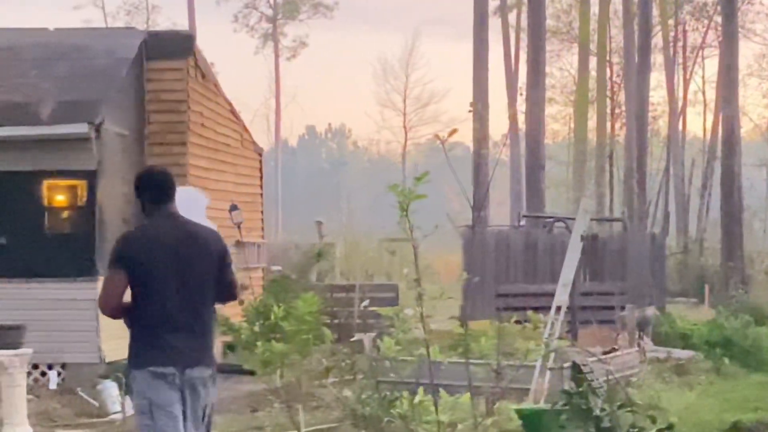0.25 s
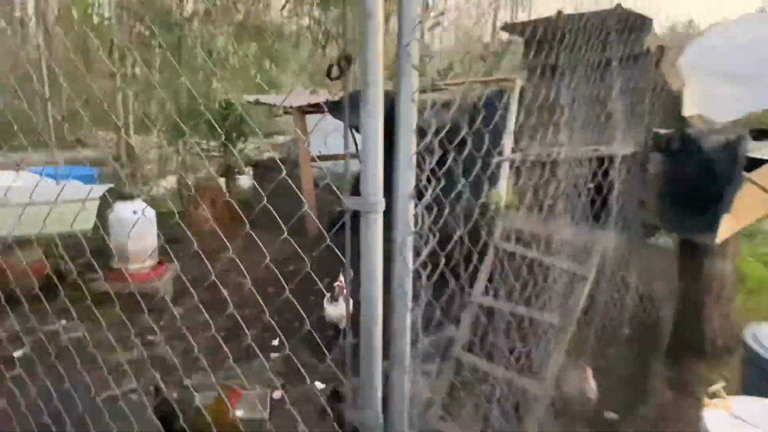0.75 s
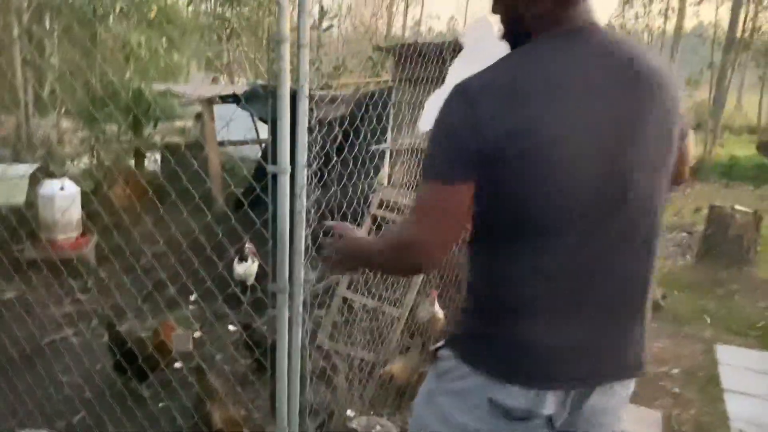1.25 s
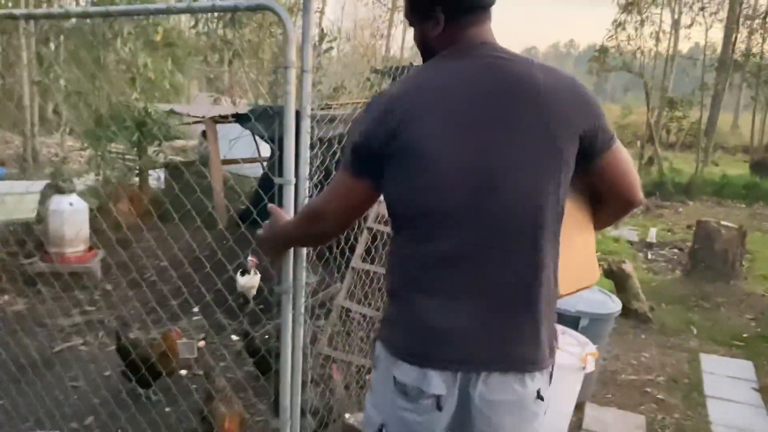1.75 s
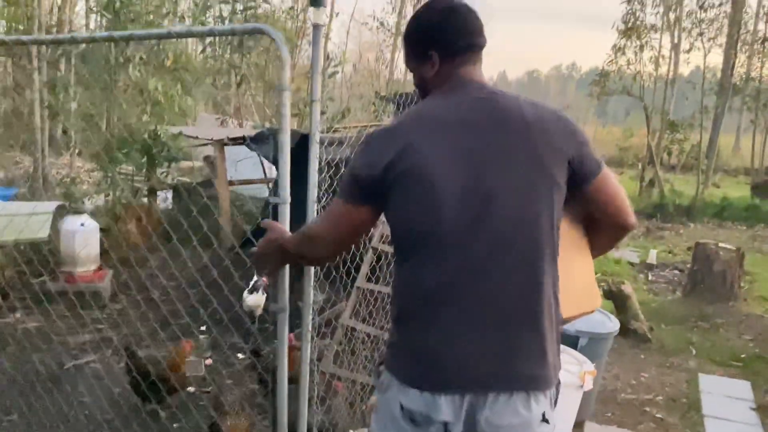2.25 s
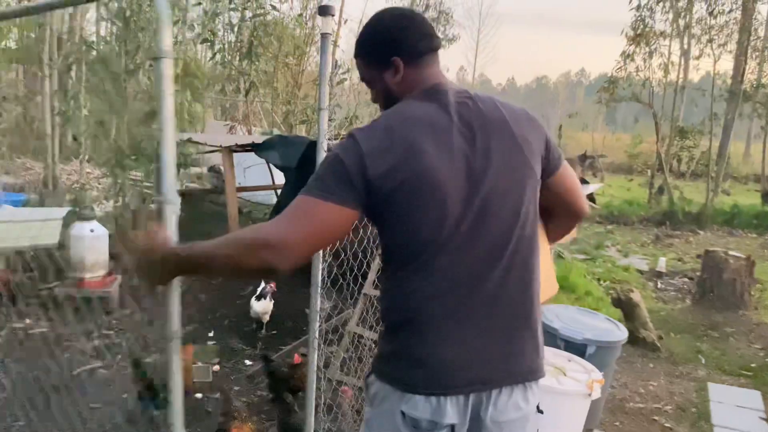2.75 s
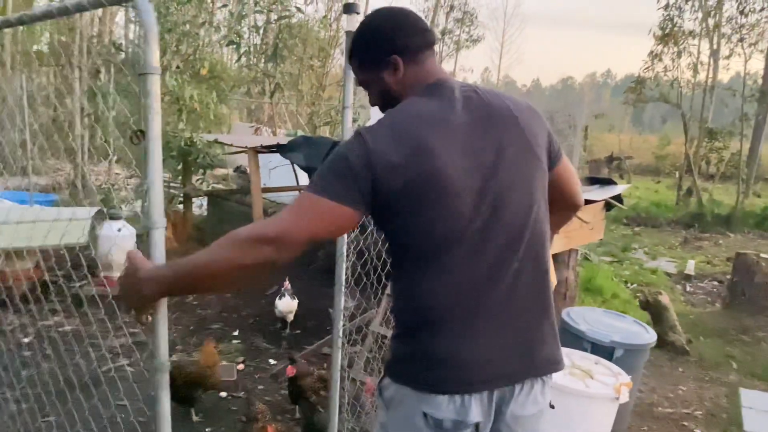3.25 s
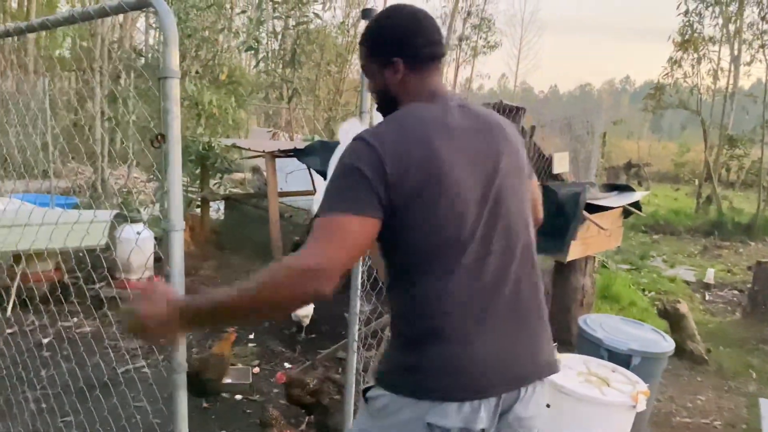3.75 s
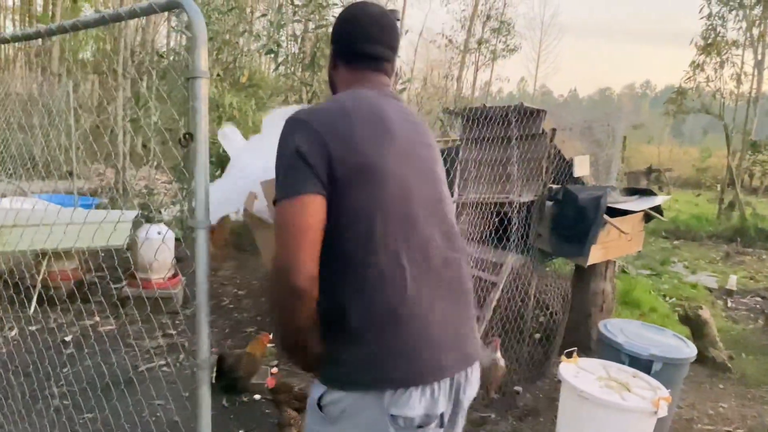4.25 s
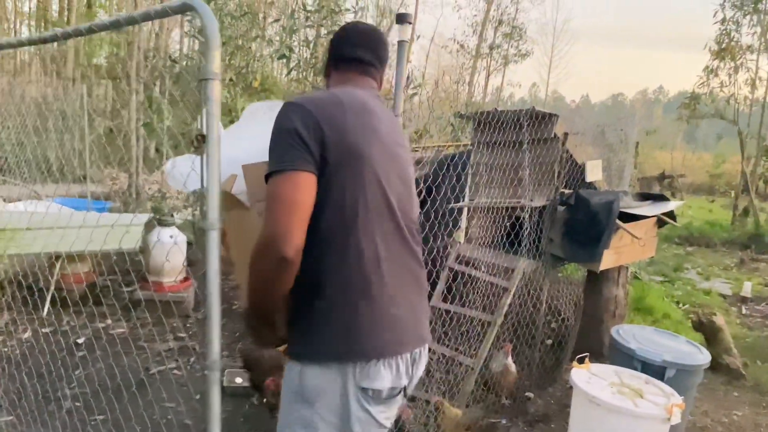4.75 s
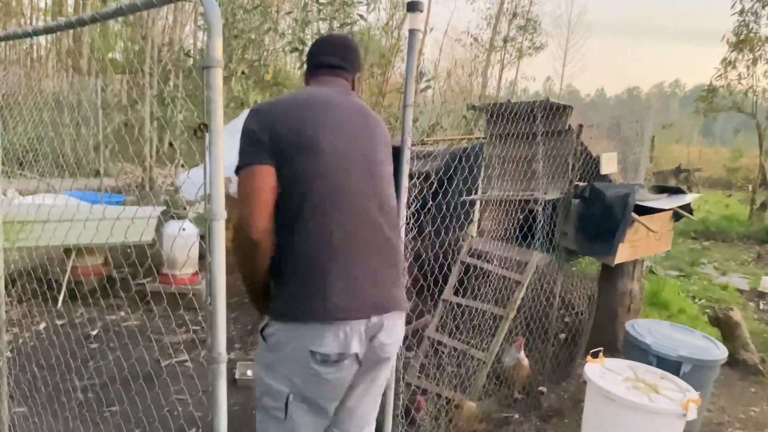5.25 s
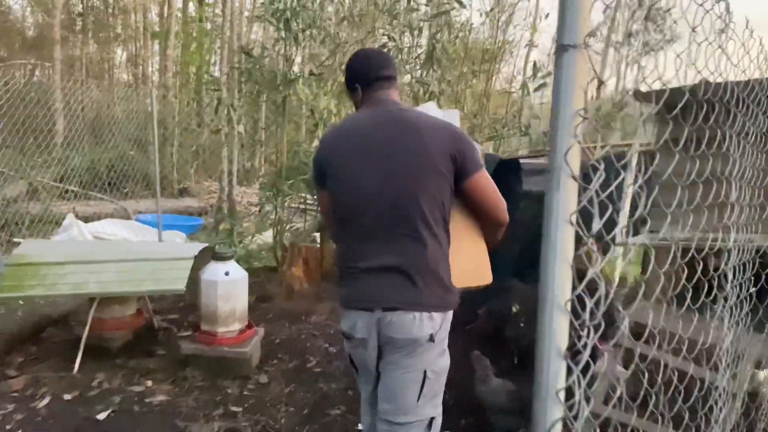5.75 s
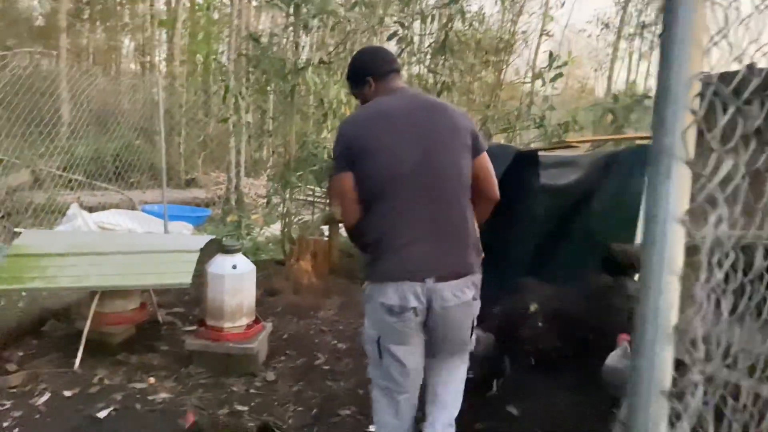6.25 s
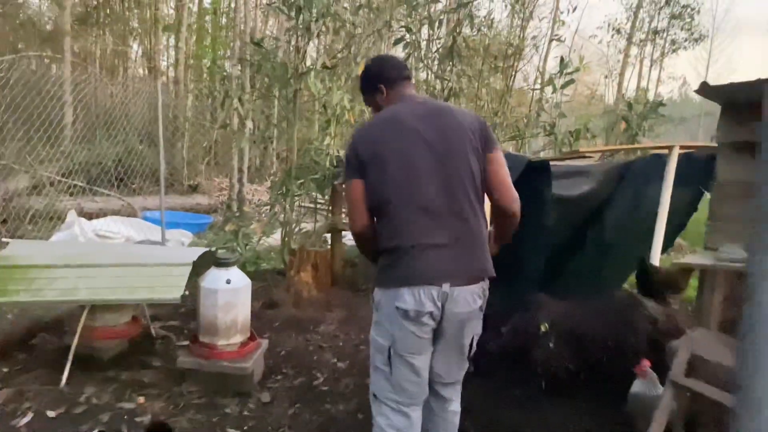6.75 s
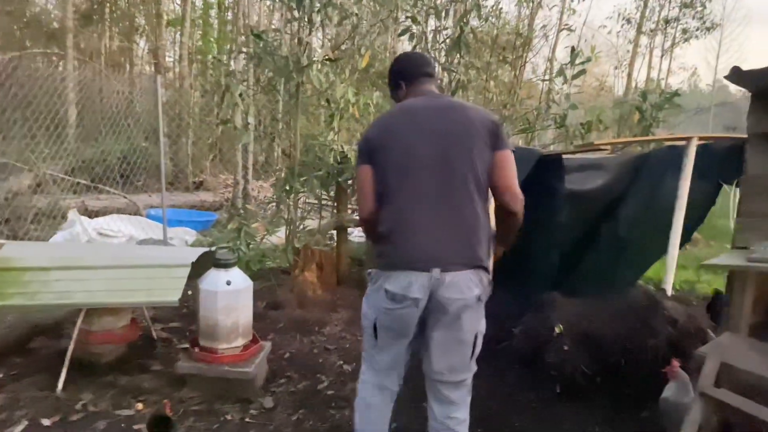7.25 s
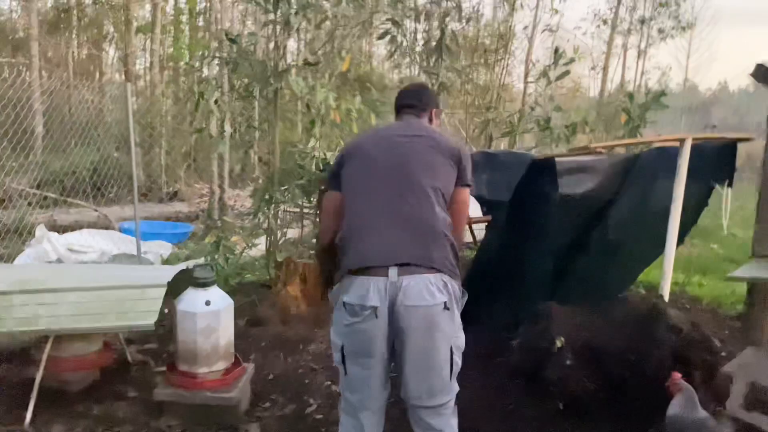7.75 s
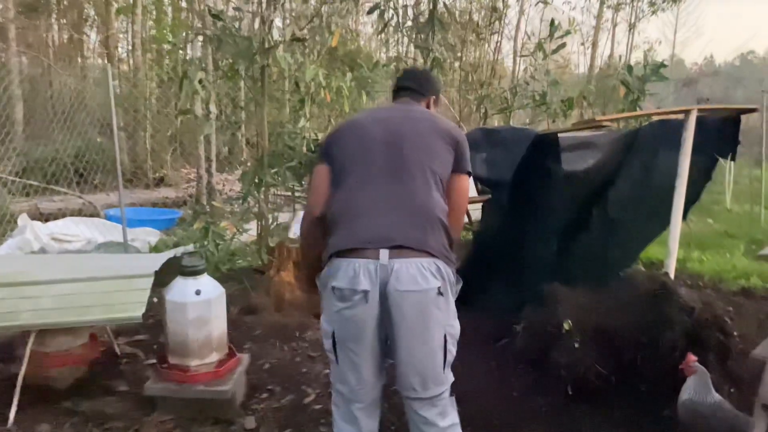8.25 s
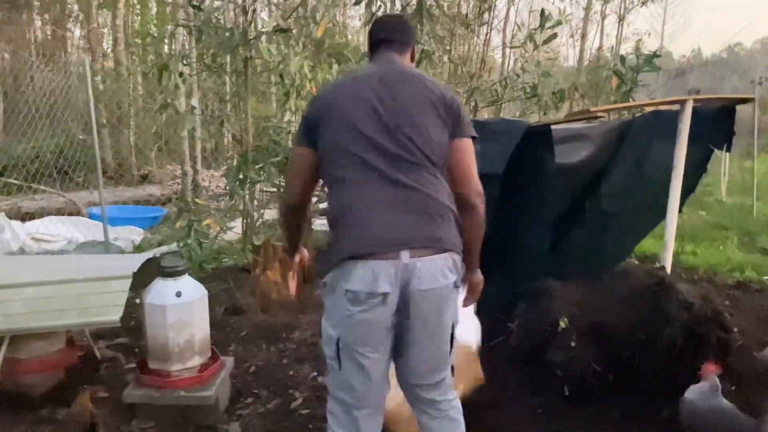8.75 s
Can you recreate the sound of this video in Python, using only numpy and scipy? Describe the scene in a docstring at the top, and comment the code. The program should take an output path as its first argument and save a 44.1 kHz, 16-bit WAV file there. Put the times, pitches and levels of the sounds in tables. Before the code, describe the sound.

Close in a quiet outdoor chicken run, hens give short low clucks, a long rising whine, then a wavering drawn-out moan. Feet and a bag rustle, wire ticks, and a small songbird whistles rising phrases. A far engine hums low in the second half. A sharp dry knock comes late, more hoarse hen calls follow, and a cardboard box lands with a hollow crunchy thump at the end.

```python
"""Hens call with drawn-out clucks and whines in a backyard run while a keeper walks in and drops a box.
A songbird repeats a rising phrase, insects sing, a wire gate ticks, feet and a bag rustle, a far engine hums.
Hens are sums of partials on drawn pitch curves with throat noise; bird notes are gliding sines with echoes.
The box, ticks and thuds are struck resonances; rustles are grainy noise; the engine is one swelling sine.
Insects, traffic rumble and the murmur of the yard are noise shaped to a band or spectrum."""
import sys
import numpy as np
from scipy import signal
from scipy.fft import rfft, irfft, next_fast_len
from scipy.io import wavfile
from scipy.ndimage import uniform_filter1d

SR = 44100
rng = np.random.default_rng(int(sys.argv[2]) if len(sys.argv) > 2 else 0)


def store_wav(level_fs):
    """Save 16-bit WAV to argv[1]."""
    pcm = np.round(np.clip(np.atleast_2d(level_fs), -1, 1) * 32767)
    wavfile.write(sys.argv[1], SR, pcm.T.astype(np.int16))


N = 396900
T = np.arange(N) / SR

# low moans and clucks, each a pair: (left minus right/dB, final hoarseness/0-1, fundamental change/dB),
# then rows of [t/s, pitch f/Hz, second partial level/dB, third partial level/dB]
MOANS = [ ((6, .25, 0), [(0.958, 337.4, -56, -75), (.972, 335, -48, -58), (.99, 335, -58, -51),
         (1.012, 325, -54, -60), (1.035, 316, -57, -48), (1.122, 310, -78, -58.5)]), ((0, .05, -12),
         [(1.268, 350, -62, -72), (1.36, 376, -63, -68)]), ((2, .3, 0), [(3.465, 315, -58, -48),
         (3.52, 346.3, -60, -62), (3.58, 362.7, -63, -72), (3.67, 409.6, -40, -62), (3.76, 398, -45.5, -82),
         (3.93, 362, -51.5, -48.5), (4.055, 405, -46, -52.5), (4.2, 384.8, -50.5, -47),
         (4.31, 413, -44, -49.5), (4.4, 396.5, -53, -48.5), (4.43, 424.6, -44, -48), (4.482, 420, -38, -54),
         (4.505, 410, -52, -65)]), ((-6, .2, -8), [(5.47, 335, -64, -46), (5.554, 348, -61, -43)]),
         ((3, .5, 3), [(7.103, 325, -56, -48), (7.132, 328, -56, -54)]), ((3, .12, 0),
         [(7.227, 314, -52, -57), (7.29, 377, -44.5, -58), (7.36, 381.6, -41, -62), (7.45, 370.2, -44, -58),
         (7.59, 391, -42, -62), (7.805, 405, -39, -69), (7.942, 402, -38.5, -71)]), ((4, .25, 0),
         [(8.085, 279.1, -65, -56.5), (8.17, 266.8, -72, -74)]), ((4, .6, 2), [(8.295, 280, -78, -66),
         (8.345, 299, -59, -60), (8.42, 325, -50, -52), (8.462, 346.3, -48, -54), (8.5, 315, -53, -57),
         (8.575, 372, -52, -46), (8.6, 412, -44, -49), (8.625, 350, -51, -47), (8.642, 315, -54, -50)]), ]
# high whines, each a pair: (left minus right/dB, final hoarseness/0-1),
# then rows of [t/s, pitch f/Hz, first partial level/dB, second partial level/dB]
WHINES = [ ((6, .3), [(0.758, 860, -50, -80), (.766, 890, -42, -80), (.776, 930, -57, -82),
          (0.797, 935, -47, -82), (.84, 940, -57, -86), (.857, 940, -49, -86), (0.872, 930, -56, -86)]),
          ((-4, .05), [(1.415, 696, -58.5, -75), (1.51, 719, -53.5, -59), (1.6, 720, -51.5, -52.5),
          (1.82, 746, -49, -49.5), (2.125, 765, -45.5, -44), (2.16, 680, -52, -46)]), ]
# spectrum of dry litter and bag: [f/Hz, relative level/dB]
LITTER = [(500, 1.5), (1200, 0), (2300, 2), (3500, 2.5), (5000, -1), (7000, 1), (8800, -12), (11000, -5),
          (15800, -9), (16100, -34)]


def amp(db):
    """dB to gain."""
    return 10 ** (np.asarray(db) / 20)


def unit(x):
    """Scale to rms 1."""
    return x / np.sqrt(np.mean(x ** 2) + 1e-20)


def in_time(rows):
    """Columns of a curve, interpolated at every sample."""
    s, *columns = np.transpose(rows)
    return [np.interp(T, s, c) for c in columns]


def at_hz(points, hz):
    """Read a spectrum on a log frequency axis."""
    corner_hz, values = np.transpose(points)
    return np.interp(np.log(hz), np.log(corner_hz), values)


def drift(rate_hz):
    """Random wander of rms 1: noise through a two-pole lowpass, made at a 20th of the sample rate."""
    r = np.exp(-40 * np.pi * rate_hz / SR)
    white = rng.standard_normal(N // 20 + 4002)
    slow = signal.lfilter([1], [1, -2 * r, r * r], white)[4000:]   # past the filter's start
    return np.interp(np.arange(N) / 20, np.arange(len(slow)), unit(slow))


def ring(clicks, hz, t60):
    """Two-pole resonance: a unit click sets off a decaying sine of height 1."""
    r, w = amp(-60 / (t60 * SR)), 2 * np.pi * hz / SR
    return signal.lfilter([0, np.sin(w)], [1, -2 * r * np.cos(w), r * r], clicks + 1e-18)


def bandpass(x, low_hz, high_hz):
    """Keep the band between two edges."""
    return signal.sosfilt(signal.butter(2, [low_hz, high_hz], "band", fs=SR, output="sos"), x)


def highpass(x, hz):
    """Remove what lies below a corner."""
    return signal.sosfilt(signal.butter(2, hz, "high", fs=SR, output="sos"), x)


def panned(x, db):
    """Place a sound between the channels by left minus right dB."""
    return np.array([x * amp(db / 2), x * amp(-db / 2)])


def coloured(spectrum, white):
    """Shape two unrelated noises, as mid and side, to a spectrum and a stereo likeness; rms 1."""
    # how alike the channels are: [f/Hz, likeness/0-1]
    likeness = [(100, 0.93), (300, 0.31), (1000, 0.63), (2500, 0.2), (6000, 0.058), (12000, 0.028)]
    size = next_fast_len(N)
    hz = np.maximum(np.arange(size // 2 + 1) * SR / size, 1)
    mid, side = rfft(white, size) * amp(at_hz(spectrum, hz))
    alike = np.clip(at_hz(likeness, hz), 0, 1)
    mid, side = np.sqrt(1 + alike) * mid, np.sqrt(1 - alike) * side
    return unit(irfft(np.array([mid + side, mid - side]), size)[:, :N])


def grove(x, t60):
    """Scattered echoes from trunks and sheds: a decaying noise tail, a different one in each channel."""
    t = np.arange(int(.4 * SR)) / SR
    tail = rng.standard_normal((2, len(t))) * amp(-60 * t / t60) * (t > .008)
    return signal.fftconvolve(x[None], tail / np.sqrt(np.sum(tail ** 2) / 2), axes=1)[:, :N]


def hens():
    """Voiced partials; hoarseness makes their strength uneven, smears noise between them and adds rasp."""
    echo_db = -22
    side_db, hoarse, chest_db = manner()
    moans = voice([call for _, call in MOANS], first=2, chest_db=chest_db)
    whines = voice([call for _, call in WHINES], first=1)
    unevenness = np.sqrt(1 - hoarse ** 2) + hoarse * drift(103)
    calls = (moans + whines) * unevenness + rasp(moans, hoarse)
    return panned(calls, side_db) + amp(echo_db) * grove(calls, t60=0.3)


def voice(calls, first, chest_db=0):
    """Harmonic partials on one jittered pitch; moans also get a fundamental and fourth and fifth partials."""
    # the strained voice flips into a higher register: [start t/s, end t/s]
    breaks = [(4.069, 4.111), (4.27, 4.288), (4.47, 4.52), (7.608, 7.64), (7.68, 7.709), (7.75, 7.804),
              (7.814, 7.843), (7.849, 7.873), (7.882, 7.895), (7.912, 7.923)]
    break_ratio, jitter, shimmer_db = 1.18, 0.01131, 1   # jitter: rms share of pitch
    first_db, first_follows = -57.5, 0.3   # the fundamental follows effort weakly, in dB per dB
    first_break_db, third_break_db = -13, -15   # outer partials fade in breaks
    fourth_db, fourth_fades_hz = -16, 1300   # against the third; fades above the throat
    fifth_db, fifth_from_hz = -20, 1950   # against the third; fades below this upper resonance
    slope_db_per_hz = .05
    pitch, low_db, high_db = in_time([row for call in calls for row in call])
    calling = sum((T >= call[0][0]) & (T < call[-1][0]) for call in calls) > 0
    flips = sum((break_ratio - 1) * ((T > a) & (T < b)) for a, b in breaks)
    lift = uniform_filter1d(flips, size=260)
    phase = 2 * np.pi * np.cumsum(pitch * (1 + lift) * (1 + jitter * drift(48.3))) / SR
    partials = {first: low_db, first + 1: high_db}
    if first > 1:
        broken = lift > .05
        third_db = high_db + third_break_db * broken
        effort_db = np.maximum(low_db, third_db)
        chest = chest_db + first_db + first_follows * (effort_db - first_db)
        above_throat = np.maximum(4 * pitch - fourth_fades_hz, 0)
        below_resonance = np.maximum(fifth_from_hz - 5 * pitch, 0)
        partials[3] = third_db
        partials[1] = chest + first_break_db * broken
        partials[4] = third_db + fourth_db - slope_db_per_hz * above_throat
        partials[5] = third_db + fifth_db - slope_db_per_hz * below_resonance
    tone = sum(amp(db + shimmer_db * drift(32)) * np.sin(k * phase) for k, db in partials.items())
    return np.sqrt(2) * tone * uniform_filter1d(calling * 1., size=260)


def manner():
    """Side, hoarseness and chest tone by call: a rough start clears, then hoarseness grows to its final value."""
    onset_hoarse, clearing_s, clear_hoarse = .35, .06, .06   # hoarseness as share 0-1
    side_db, hoarse, chest_db = np.zeros((3, N))
    for (db, final, *chest), call in sorted(MOANS + WHINES, key=lambda call: call[1][0]):
        since, length = T - call[0][0], call[-1][0] - call[0][0]
        begun = since > -.01
        grown = clear_hoarse + (final - clear_hoarse) * np.clip(since / length, 0, 1)
        rough_start = onset_hoarse * np.exp(-np.abs(since) / clearing_s)
        side_db = np.where(begun, db, side_db)
        chest_db = np.where(begun, sum(chest), chest_db)   # whines list none: 0 dB
        hoarse = np.where(begun, np.maximum(grown, rough_start), hoarse)
    return side_db, hoarse, chest_db


def rasp(calls, hoarse):
    """Hoarse air: noise in the throat resonance follows the strength and hoarseness of the voice."""
    throat_hz, width_hz, rasp_db = 920, 300, 0
    strength = np.sqrt(np.maximum(uniform_filter1d(calls ** 2, size=600), 0))
    air = bandpass(rng.standard_normal(N), throat_hz - width_hz / 2, throat_hz + width_hz / 2)
    return amp(rasp_db) * hoarse * strength * unit(air)


def box():
    """Each contact cracks the cardboard and drives its hollow modes; the bag inside hisses as it settles."""
    # the box lands corner by corner: [t/s, blow level/dB]
    landing = [(8.7755, -29), (8.779, -27), (8.7825, -26), (8.7857, -15.5), (8.7895, -18), (8.793, -16.5),
               (8.798, -24)]
    # hollow modes of the box: [f/Hz, relative level/dB, decay t60/s]
    modes = [(66.7, 4.5, 0.12), (115, -7, .15), (233, 1, 0.059), (385, 11, 0.035), (513, -1, 0.12),
             (770, 10.5, 0.015), (932, 1.5, 0.077)]
    weight_s = 8.802   # the full weight comes down after the corners
    body_db, crack_db, crack_top_hz, bag_db, bag_t60_s = -16.5, 4, 2700, -30.5, 0.55
    blows = np.zeros(N)
    for s, db in landing:
        blows[int(s * SR)] = amp(db)
    weight = uniform_filter1d(np.eye(1, N, int(weight_s * SR))[0], size=90)   # a soft, slow push
    body = sum(amp(db) * ring(weight + 1.25 * blows, hz, t60) for hz, db, t60 in modes)
    body = highpass(body, 50)
    echo = amp(-3) * grove(highpass(body, 300), t60=.06)   # off the ground and the shed
    crunch_decay = signal.lfilter([1], [1, -amp(-60 / (.025 * SR))], blows + 1e-18)   # t60 25 ms
    crack = bandpass(rng.standard_normal(N) * crunch_decay, 500, crack_top_hz)
    since = np.maximum(T - landing[0][0], 0)
    settle = np.minimum(since / 0.0063, 1) * amp(-60 * since / bag_t60_s + 2.0 * drift(20))
    hiss = coloured(LITTER, rng.standard_normal((2, N)) * [[1], [.4]])   # weaker side, narrower image
    bag = amp(bag_db) * settle * hiss
    return amp(body_db) * (panned(body, 0.48) + echo) + amp(crack_db) * panned(crack, -5.0) + bag


def songbird():
    """Whistled notes: gliding sines with a wavering pitch and throbbing level, blurred by the trees."""
    # rising phrase: [t after start/s, from f/Hz, to f/Hz, length/s, relative level/dB]
    phrase = [(-.032, 3330, 3210, 0.013, 8.5), (0, 2813, 2772, 0.045, 13.5), (.052, 2770, 2750, 0.04, 10),
              (0.065, 3600, 3696, 0.1, 9), (.15, 4300, 4680, .04, 13), (0.186, 4660, 4590, 0.13, 12.5)]
    # its repeats: [t/s, level/dB, change of the low opening notes/dB, lateness of the high notes/s]
    songs = [(3.405, -64, -5, -.065), (4.781, -66, -5, -.015), (5.683, -64, -3, -.015),
             (6.905, -65, 0, .005), (8.365, -66, -2, 0)]
    # notes of a quick, clipped phrase, then one lone high note:
    # [t/s, from f/Hz, to f/Hz, length/s, level/dB]
    clipped_phrase_and_lone_note = [(.349, 2764, 2710, 0.013, -49.5), (.374, 2680, 2820, 0.045, -56),
                                    (.395, 3270, 3630, 0.031, -61), (.42, 4400, 4680, 0.035, -52),
                                    (1.122, 4535, 4550, 0.026, -50)]
    low_note_hz, softness, note_fade_db = 4000, .3, 9   # each note fades
    buzz_from_hz, buzz, plain_waver = 3000, .04, .011   # middle notes waver into a buzz; shares of pitch
    echo_db, echo_t60_s = -5, .35
    notes = list(clipped_phrase_and_lone_note)
    for s, song_db, low_db, late in songs:
        for delay, a, b, length, db in phrase:
            start = s + delay + late * (a > low_note_hz)
            notes.append((start, a, b, length, db + song_db + low_db * (a < low_note_hz)))
    song, wobble = np.zeros(N), drift(220)
    for s, from_hz, to_hz, length, db in notes:
        t, at = np.arange(int(length * SR)) / SR, int(s * SR)
        depth = buzz if buzz_from_hz < from_hz < low_note_hz else plain_waver
        waver = 1 + depth * wobble[at:][:len(t)]
        phase = 2 * np.pi * np.cumsum(np.linspace(from_hz, to_hz, len(t)) * waver) / SR
        swell = np.sin(np.pi * t / length) ** softness
        level = amp(db + note_fade_db * (.5 - t / length))
        song[at:at + len(t)] += level * swell * np.sin(phase)
    song = song * amp(2.5 * drift(45))
    return panned(song, -5.0) + amp(echo_db) * grove(song, t60=echo_t60_s)


def ticks():
    """Gate wire, twigs and box tick: a click and noise drive two damped modes, with a bright snap at the head."""
    # ticks: [t/s, level/dB, lower mode f/Hz, decay t60 of the noise/s]
    knocks = [(0.616, -47, 1200, 0.071), (0.817, -36.5, 980, 0.067), (1.179, -39, 1130, 0.061),
              (1.212, -42, 1050, 0.05), (1.5448, -42, 2400, 0.038), (2.3672, -42, 6330, 0.04),
              (4.9988, -45, 2530, 0.058), (5.1319, -31, 2500, 0.016), (5.3534, -44, 2040, 0.053),
              (5.5895, -37, 1780, 0.05), (5.676, -39, 1800, 0.08), (5.684, -27.5, 824, 0.084),
              (6.2155, -35, 2000, 0.037), (6.784, -44, 2400, 0.0095), (6.8199, -15.5, 1480, 0.011),
              (7.468, -36, 6000, .02), (8.688, -43, 1100, .03)]
    ring_share, shortest_ring_s = .15, .0045   # ring t60 as share of the noise's
    overtone, overtone_db = 1.8, -5   # ratio and level of the upper mode
    snap_hz, snap_share, snap_t60_s = 12000, .35, .006   # lowpass corner, level, decay
    out, size = np.zeros(N + SR), 6000
    t, click = np.arange(size) / SR, np.eye(1, size)[0]
    dull = signal.butter(1, snap_hz, fs=SR)
    for s, db, hz, t60 in knocks:
        noise = rng.standard_normal(size)
        burst = noise * amp(-60 * t / t60)
        drive = click + 0.12 * burst
        rings = ring(drive, hz, max(ring_share * t60, shortest_ring_s))
        rings = rings + amp(overtone_db) * ring(drive, overtone * hz, ring_share * t60)
        snap = signal.lfilter(*dull, noise * amp(-60 * t / snap_t60_s))
        out[int(s * SR):int(s * SR) + size] += amp(db) * (0.8 * rings + 0.07 * burst + snap_share * snap)
    return panned(out[:N], -2.2)


def thuds():
    """Soft footfalls and bumps: one low, heavily damped push each, with a short rise."""
    # [t/s, level/dB, f/Hz]
    footfalls = [(0.614, -39, 111), (0.755, -38, 260), (1.361, -30.5, 252), (3.029, -34.5, 88.5),
                 (4.104, -31, 250), (5.137, -29, 140), (6.216, -38, 420), (8.69, -42, 240)]
    t60_s, rise_s = 0.03, 0.0017
    out, size = np.zeros(N + SR), 6000
    t, click = np.arange(size) / SR, np.eye(1, size)[0]
    for s, db, hz in footfalls:
        push = ring(click, hz, t60_s) * np.minimum(t / rise_s, 1)
        out[int(s * SR):int(s * SR) + size] += amp(db) * push
    return panned(out[:N], -2.2)


def rustle():
    """Feet, cloth and bag: litter-coloured hiss with clumped crackle grains, plus small pings."""
    flicker_db = .7 * drift(25)
    chance = 900 * amp(4 * drift(12)) / SR   # about 900 grains a second, in clumps
    grain_heights = amp(4.3 * np.minimum(rng.exponential(1, N), 5))
    grains = (rng.random(N) < chance) * grain_heights
    clumps = unit(signal.lfilter([1], [1, -.97], grains))
    crackle = rng.standard_normal((2, N)) * (1 + 0.3 * clumps)
    return stirring() * amp(9.0 + flicker_db) * (patchy(coloured(LITTER, crackle)) + pings())


def stirring():
    """Strength of the rustle: each stir rises, long ones more slowly, holds and fades over a faint shuffle."""
    # feet in litter, cloth and bag: [t of full strength/s, relative level/dB, hold/s, fading t60/s]
    stirs = [(0.6, -71.5, 0.014, 1.5), (0.806, -63.5, 0.013, 0.25), (1.167, -66.5, .04, 0.82),
             (1.548, -56.5, 0.016, 1.17), (2.189, -68.5, 0.064, 0.58), (2.377, -63.5, .01, 0.3),
             (2.87, -64, 0.58, 1.5), (4.075, -60.5, 0.026, 0.44), (5.682, -47, 0.0054, 0.075),
             (6.17, -66.5, 0.21, 2.2), (6.63, -63, .07, .7), (7.272, -57.5, .01, 0.57),
             (7.386, -55, .02, 0.31)]
    # the faint shuffle between them: [t/s, relative level/dB]
    shuffle = [(0, -71), (.15, -84.5), (1.1, -76.5), (2.3, -72.5), (5.6, -70), (7.2, -66.5), (7.9, -74),
               (8.76, -67.5)]
    attack_s = 0.013   # plus a tenth of the hold
    power = amp(*in_time(shuffle)) ** 2
    for s, db, hold, t60 in stirs:
        rise = np.clip((T - s) / (attack_s + hold / 10) + 1, 0, 1)
        fade_db = -60 * np.maximum(T - s - hold, 0) / t60
        power = power + (rise * amp(db + fade_db)) ** 2
    return np.sqrt(power)


def patchy(x):
    """Each colour of the rustle comes and goes: neighbouring bands swell and sink apart."""
    # borders between the bands: [f/Hz]
    splits_hz = [1300, 2200, 3600, 6000]
    depth_db, rate_hz = 2.2, 18
    out = 0
    for hz in splits_hz:
        low = signal.sosfilt(signal.butter(2, hz, fs=SR, output="sos"), x)
        out = out + amp(depth_db * drift(rate_hz)) * low
        x = x - low
    return out + amp(depth_db * drift(rate_hz)) * x


def pings():
    """Twigs, wire and grit ring briefly: random clicks dealt to 16 short resonances."""
    per_second, level_db, t60_s = 300, -10, .035   # level against the hiss
    clicks = (rng.random(N) < per_second / SR) * rng.standard_normal(N)
    dealt = rng.integers(0, 16, N)
    pitches_hz = np.geomspace(900, 5500, 16)
    rings = sum(ring(clicks * (dealt == k), hz, t60_s) for k, hz in enumerate(pitches_hz))
    return amp(level_db) * unit(rings)


def drags():
    """Gate, feet and a far rasp drag by: gritty bands of noise that swell and stop."""
    # [start t/s, end t/s, level/dB, centre f/Hz, band edge ratio (at least 1.05 is used), fade-out exponent]
    scrapes = [(2.85, 3.07, -56, 950, 1.8, 1.5), (2.9, 2.98, -52, 1200, 1.15, 2.5),
               (3.27, 3.33, -54, 1200, 1.3, 1.5), (5.37, 5.457, -46, 680, 1.5, .02),
               (6.233, 6.52, -57, 2470, 1.02, .4), (6.93, 7.23, -62, 2400, 1.06, .6),
               (7.9, 8.4, -61, 2550, 1.09, .8), (7.36, 7.46, -58, 10800, 1.15, 1.2),
               (8.485, 8.53, -55, 1800, 1.3, 1.5)]
    out, uneven = np.zeros(N), amp(2 * drift(60))
    for a, b, db, hz, edge, soft in scrapes:
        at, size = int(a * SR), int((b - a) * SR)
        grit = rng.standard_normal(size) * uneven[at:][:size]
        edge = max(edge, 1.05)
        shape = np.linspace(0, 1, size) * np.linspace(1, 0, size) ** soft
        scrape = unit(bandpass(grit, hz / edge, hz * edge))
        out[at:at + size] += amp(db) * scrape * shape / shape.max()
    return panned(out, -1.2)


def engine():
    """A low firing note, one sine, that swells and sinks far off."""
    # [t/s, f/Hz, level/dB]
    firing = [(5.45, 64.7, -41), (5.7, 65.2, -38.5), (6.1, 67.3, -37.5), (6.45, 72.95, -40.5),
              (6.75, 74.85, -44), (7, 74.5, -40), (7.25, 71, -43.5), (7.55, 68.26, -37.5),
              (7.85, 64.6, -42.5), (8.35, 58.66, -58)]
    hz, db = in_time(firing)
    on = uniform_filter1d(1. * ((T > firing[0][0]) & (T < firing[-1][0])), size=1200)
    note = np.sin(2 * np.pi * np.cumsum(hz) / SR)
    return np.sqrt(2) * on * amp(db + 1.3 * drift(11.0)) * note


def insects():
    """Insect song as a narrow band of noise, unrelated in the two channels."""
    # [t/s, level/dB]
    chorus = [(.33, -67), (.36, -71), (9, -66.5)]
    centre_hz, width_hz = 4665, 670
    band = bandpass(rng.standard_normal((2, N)), centre_hz - width_hz / 2, centre_hz + width_hz / 2)
    return amp(*in_time(chorus)) * unit(band)


def traffic():
    """Distant rumble: wandering noise crowded into the deep bass."""
    # [t/s, level/dB]
    levels = [(0, -52.5), (.42, -51), (.5, -62.5), (1.1, -66), (1.2, -53), (2.2, -54), (5.3, -52),
              (8, -50.5), (9, -45.5)]
    # [f/Hz, relative level/dB]
    spectrum = [(20, -17), (43, 6), (65, 13), (100, 3.5), (130, -1.5), (220, -42.5)]
    level_db, = in_time(levels)
    return amp(level_db + 2 * drift(5)) * coloured(spectrum, rng.standard_normal((2, N)))


def murmur():
    """Soft broad murmur of the yard: slowly swelling shaped noise."""
    # [t/s, level/dB]
    levels = [(0, -64.5), (.45, -68.5), (1.2, -62.5), (2.6, -65.5), (3.1, -59), (4.7, -63.5), (5.5, -56.5),
              (7.2, -59.5), (9, -58.5)]
    # [f/Hz, relative level/dB]
    spectrum = [(80, -42), (130, -4), (300, -4), (600, -12.5), (1300, -15), (3500, -26), (6000, -40)]
    level_db, = in_time(levels)
    return amp(level_db + 2.2 * drift(8)) * coloured(spectrum, rng.standard_normal((2, N)))


def scene():
    """All sources of the yard, summed in stereo."""
    near = hens() + box() + ticks() + thuds() + rustle() + drags()
    return near + songbird() + engine() + insects() + traffic() + murmur()


def record(dry):
    """Left leads slightly, deepest bass goes, the level dips briefly, loud peaks round off, the top is cut."""
    # brief dips of level: [start t/s, end t/s]
    dips = [(.339, .347), (.362, .371), (5.458, 5.463)]
    left_lag, ceiling, cutoff_hz = -4, .5, 16900   # samples, peak height, Hz
    ports = np.array([np.roll(dry[0], left_lag), dry[1]])
    ports = highpass(ports, 38)
    for a, b in dips:
        ports = ports * uniform_filter1d(1. * ((T < a) | (T > b)), size=260)
    ports = ceiling * np.tanh(ports / ceiling)
    return signal.sosfilt(signal.cheby2(12, 70, cutoff_hz, fs=SR, output="sos"), ports)


dry = scene()
out = record(dry)
store_wav(out)
```